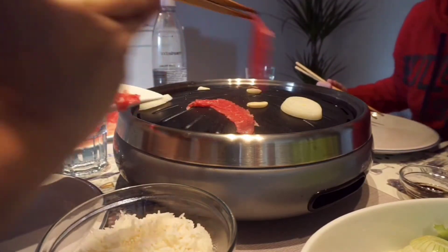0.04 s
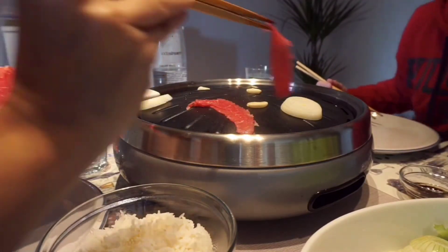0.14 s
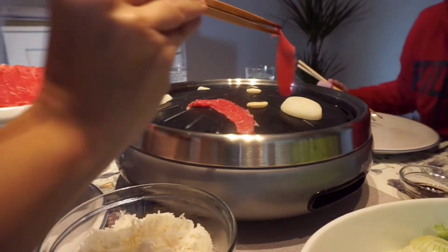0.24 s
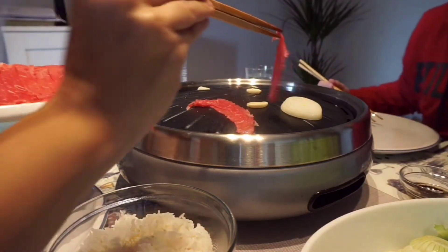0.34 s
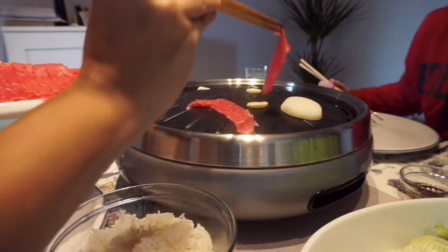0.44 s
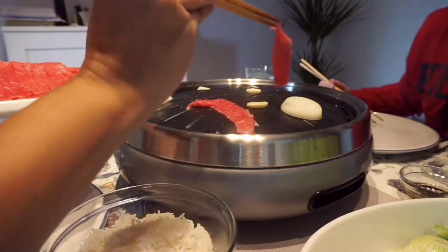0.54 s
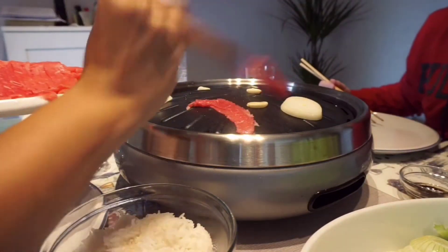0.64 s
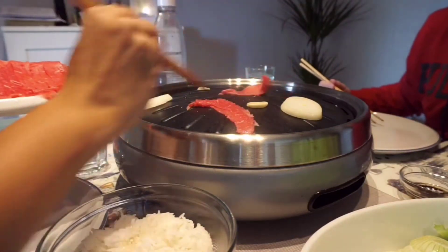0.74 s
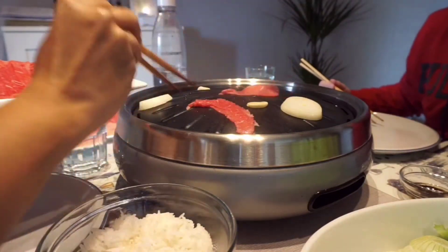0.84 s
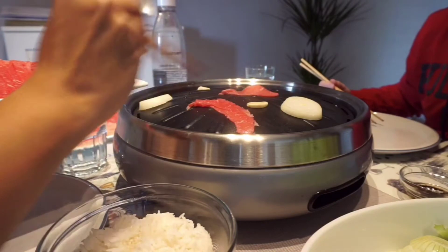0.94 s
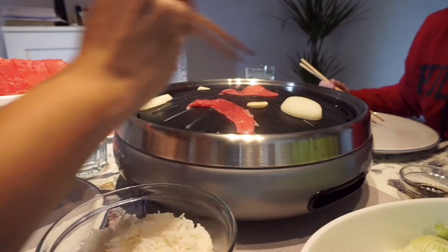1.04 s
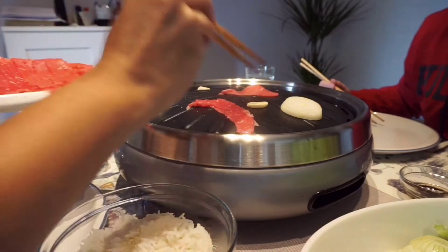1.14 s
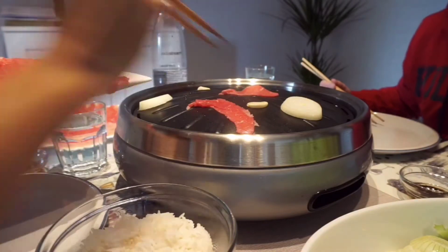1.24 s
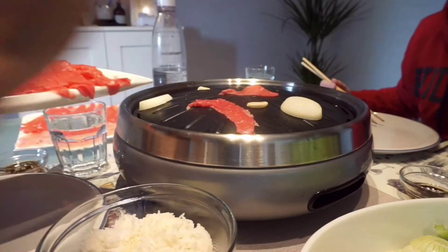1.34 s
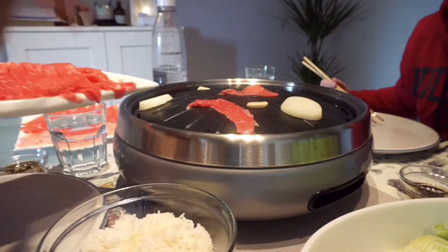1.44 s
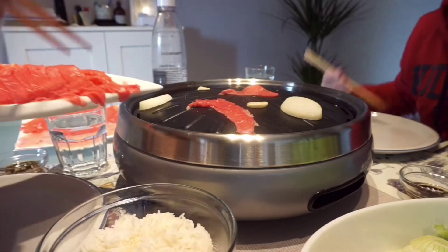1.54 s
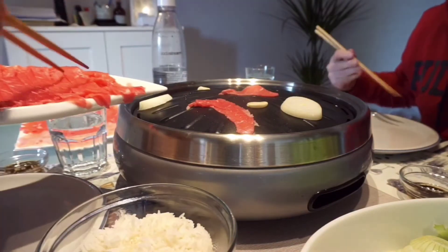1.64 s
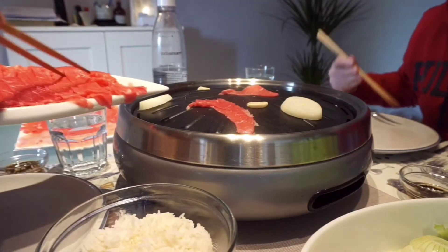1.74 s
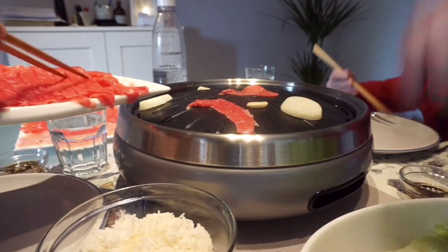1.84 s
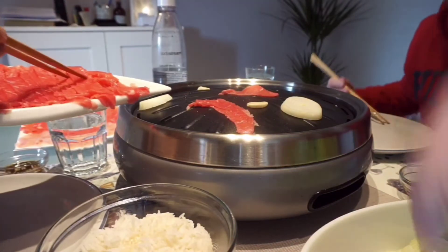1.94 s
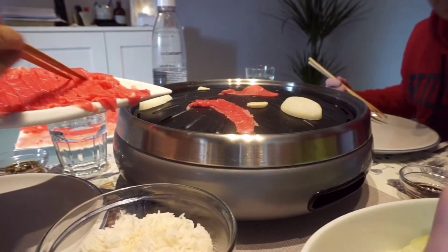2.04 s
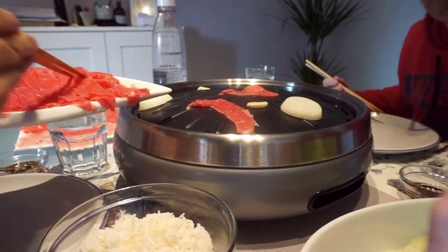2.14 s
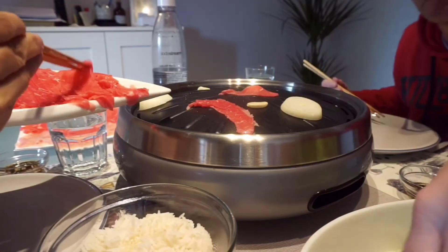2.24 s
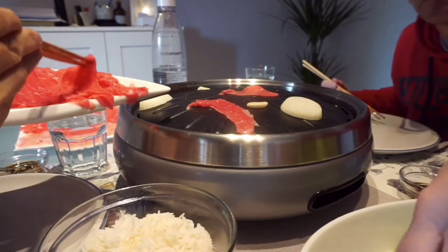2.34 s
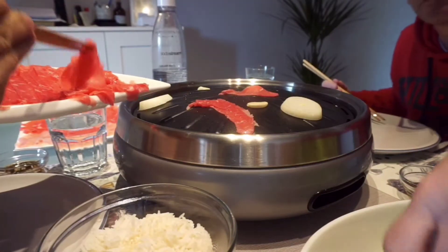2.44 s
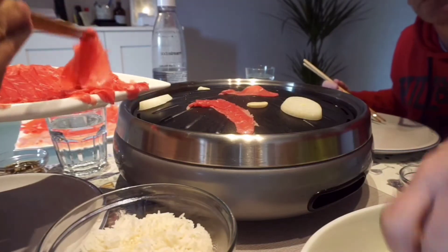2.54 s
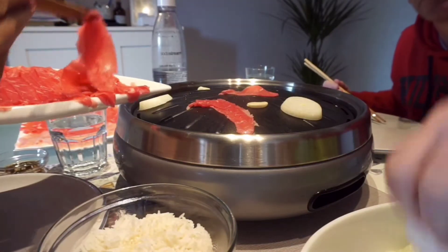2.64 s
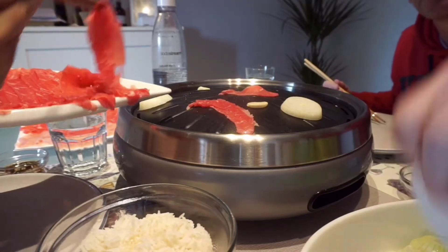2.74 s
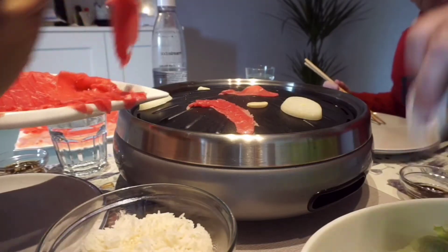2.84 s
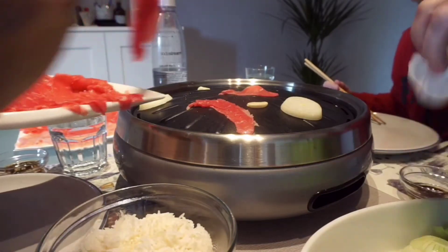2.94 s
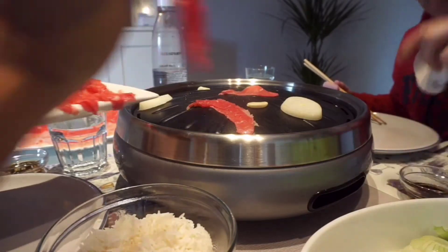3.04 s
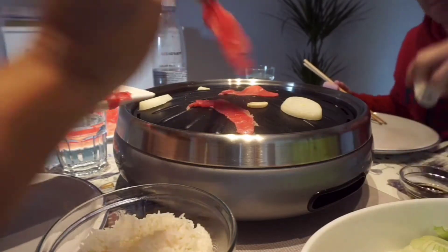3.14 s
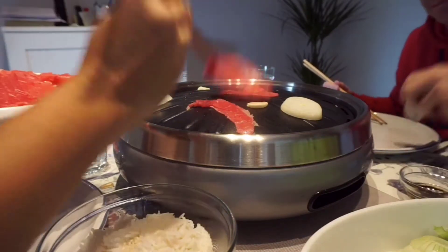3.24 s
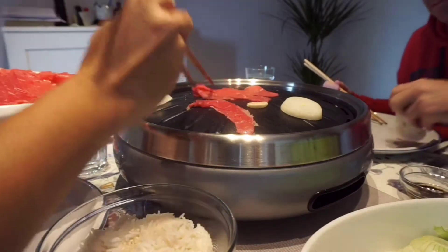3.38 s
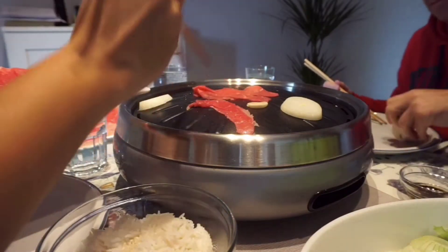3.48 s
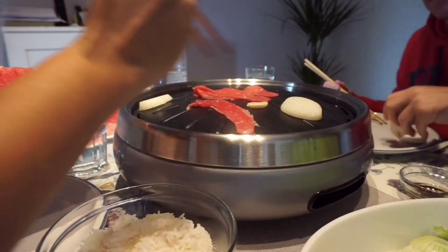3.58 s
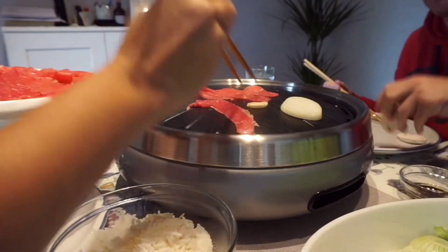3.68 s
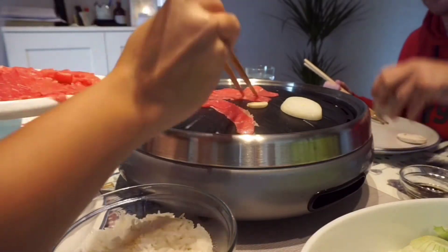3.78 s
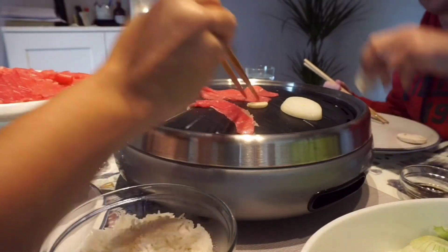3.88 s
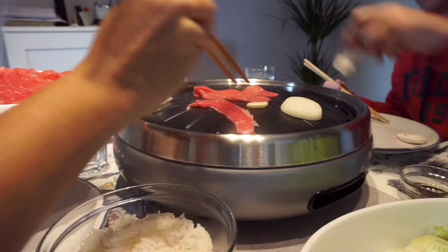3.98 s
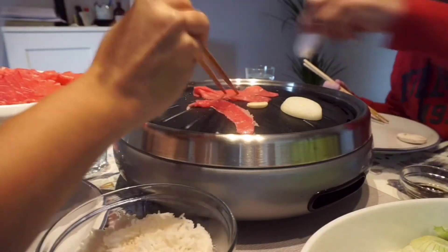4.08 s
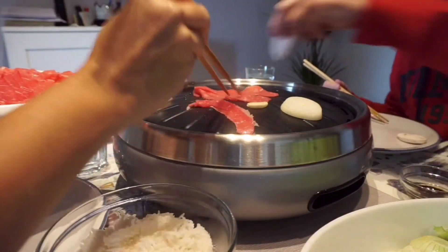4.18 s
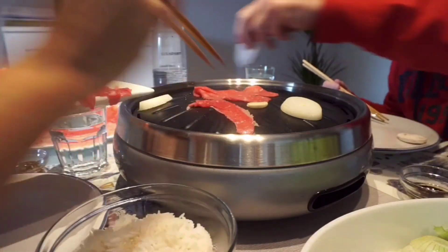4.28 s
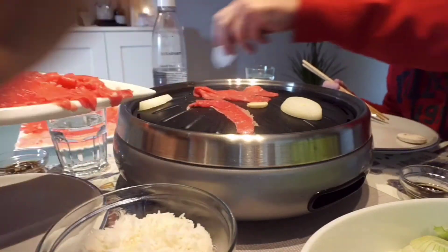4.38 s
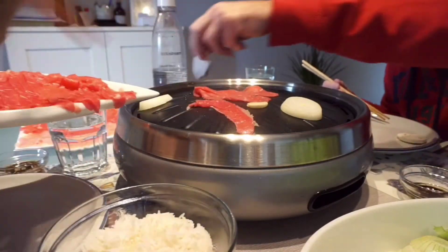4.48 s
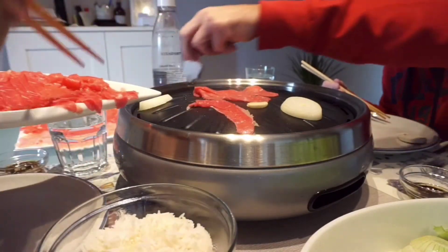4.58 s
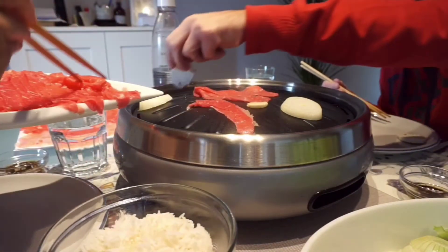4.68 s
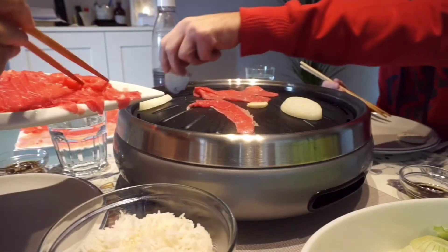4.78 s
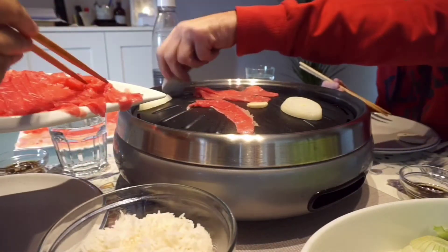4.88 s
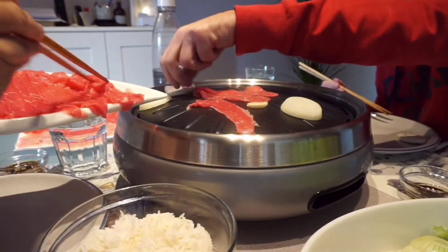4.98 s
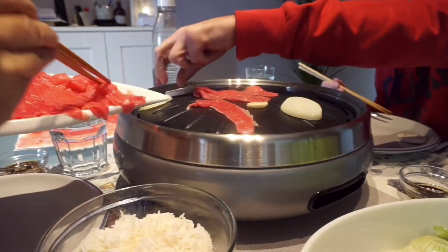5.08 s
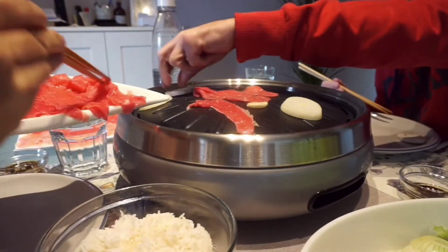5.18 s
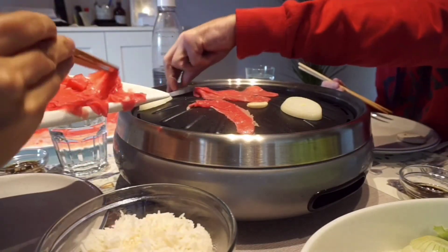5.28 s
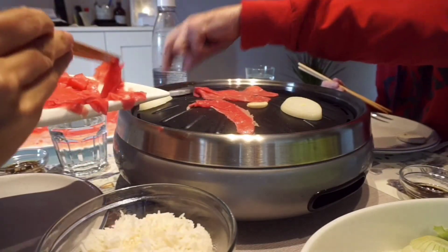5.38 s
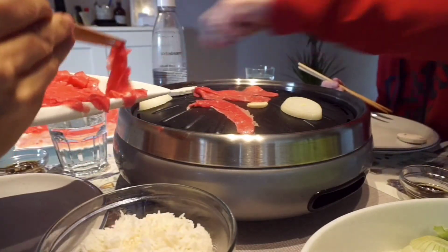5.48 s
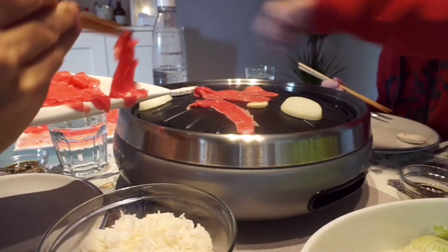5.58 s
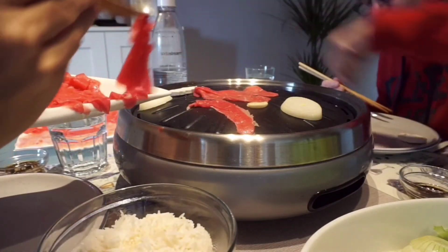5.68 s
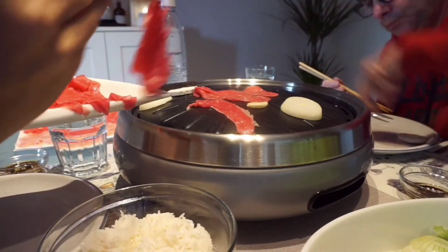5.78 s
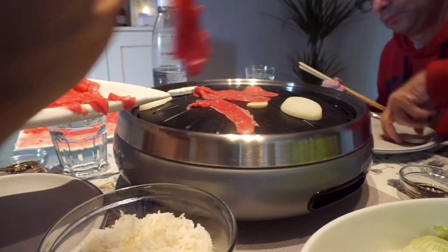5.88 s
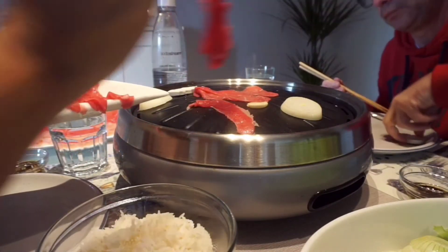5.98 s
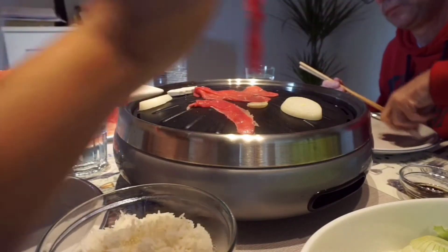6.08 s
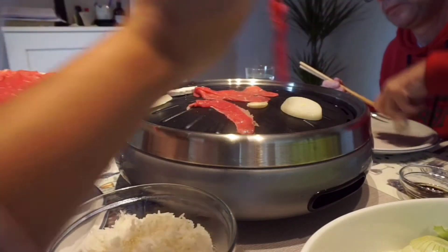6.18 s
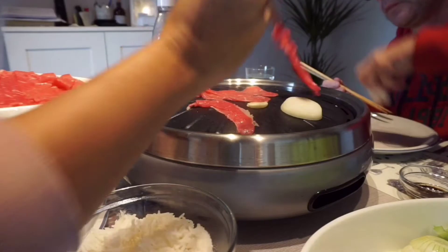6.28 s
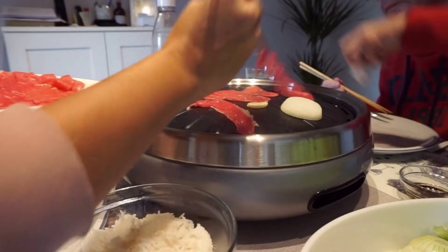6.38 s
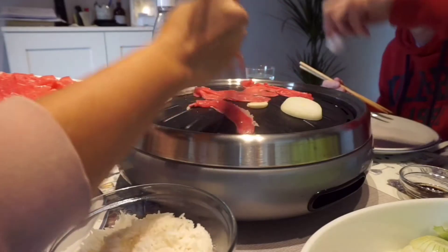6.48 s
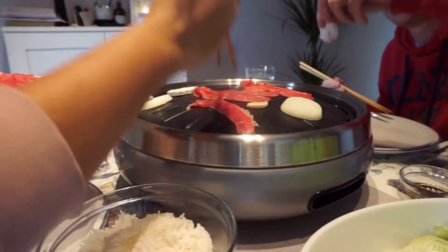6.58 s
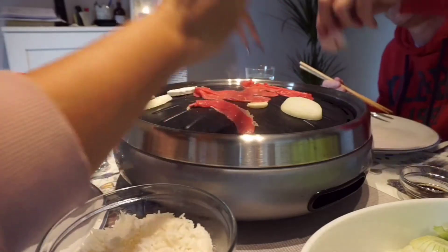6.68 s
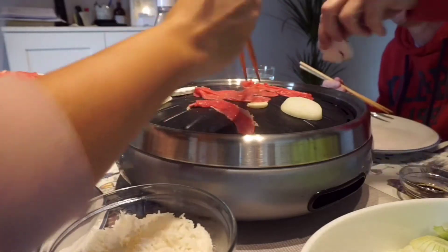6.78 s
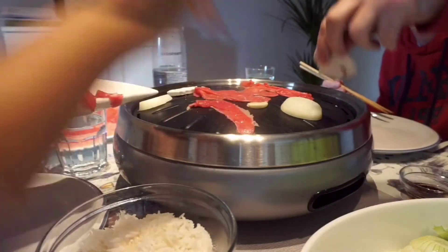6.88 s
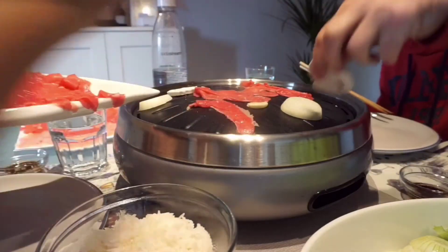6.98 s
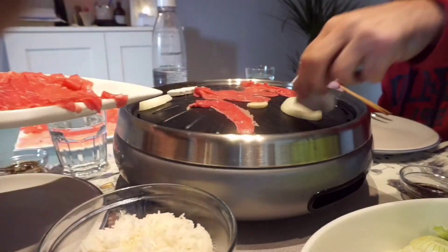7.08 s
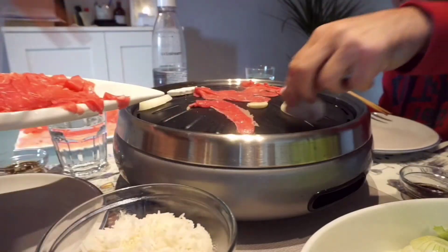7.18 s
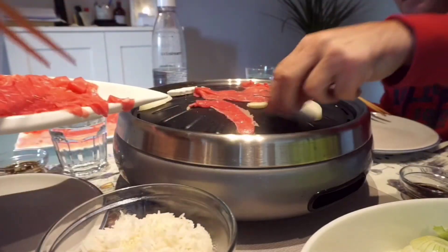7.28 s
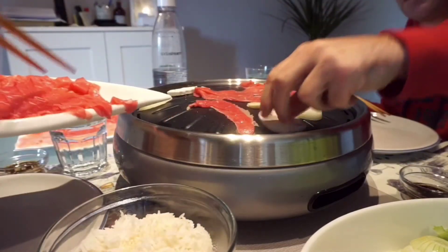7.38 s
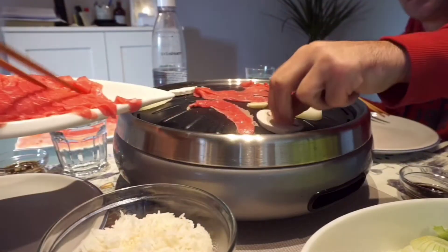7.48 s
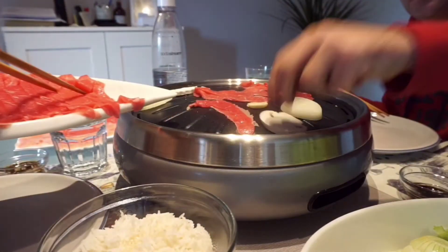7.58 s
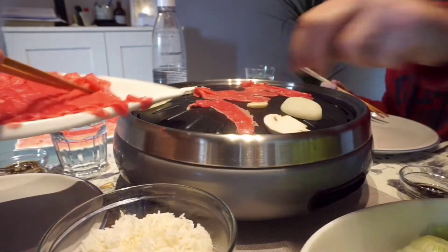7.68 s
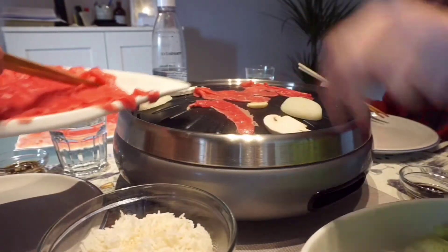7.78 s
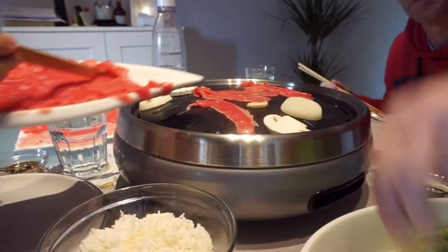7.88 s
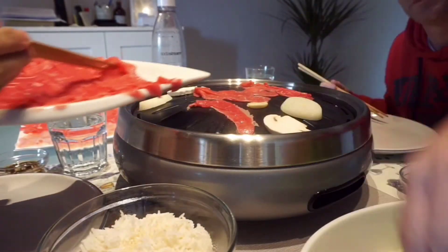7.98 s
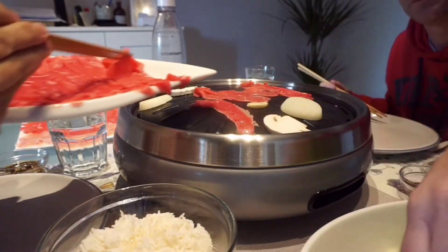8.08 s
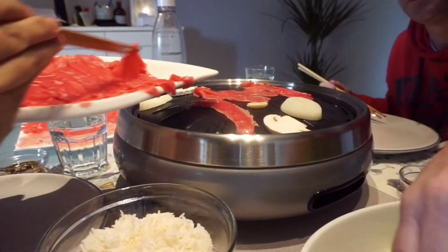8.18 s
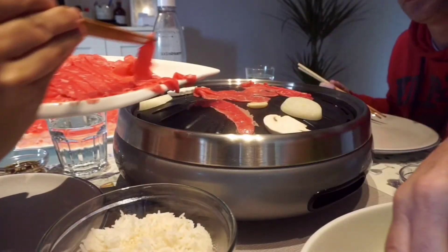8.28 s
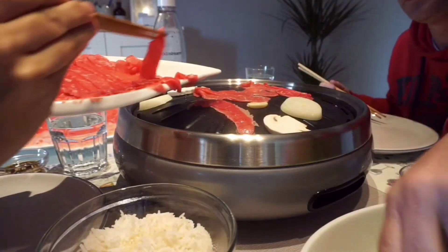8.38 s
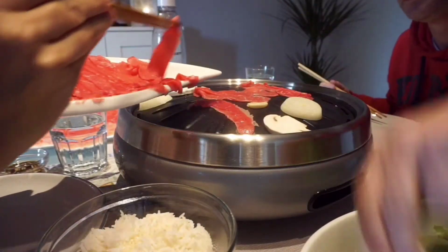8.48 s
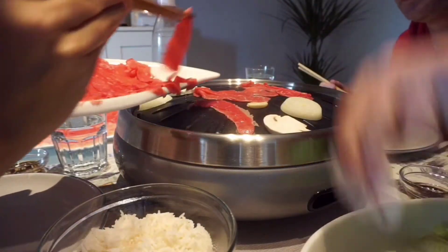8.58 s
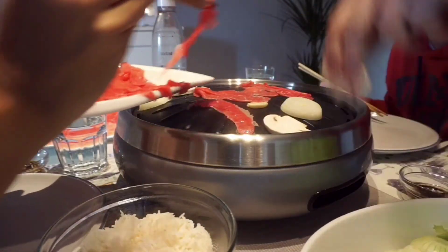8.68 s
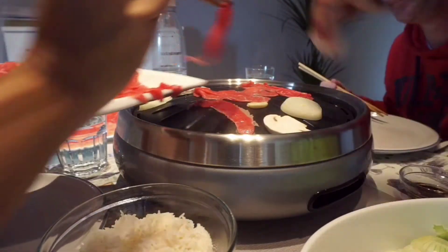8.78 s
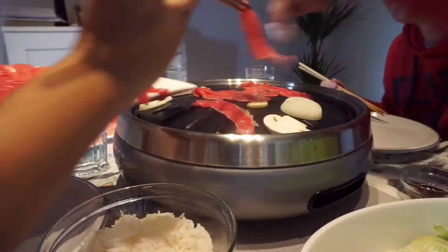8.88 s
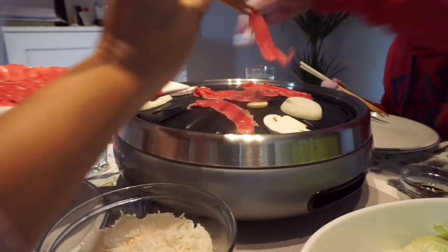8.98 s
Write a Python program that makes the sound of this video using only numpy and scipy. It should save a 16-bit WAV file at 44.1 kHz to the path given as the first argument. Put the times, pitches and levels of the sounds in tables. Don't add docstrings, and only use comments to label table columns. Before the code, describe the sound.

Thin meat slices sizzle unevenly on a hot tabletop grill over a low fan hum, with light chopstick ticks and one firm knock.

```python
import sys
import numpy as np
from scipy import signal
from scipy.io import wavfile

SR = 44100
rng = np.random.default_rng(int(sys.argv[2]) if len(sys.argv) > 2 else 0)


def int16_out(signal):
    q = np.round(np.clip(np.atleast_2d(signal).T, -1, 1) * 32767)
    wavfile.write(sys.argv[1], SR, q.astype(np.int16))


def voltage_ratio(decibels):
    exponent = np.asarray(decibels, float) / 20
    return 10 ** exponent


N = 398223


def rms_one(x):
    return x / np.sqrt(np.mean(x ** 2) + 1e-20)


def in_time(rows):
    s, *columns = np.transpose(rows)
    return [np.interp(np.arange(N) / SR, s, column) for column in columns]


def at_hz(points, hz):
    table_hz, values = np.array(points).T
    return np.interp(np.log(hz), np.log(table_hz), values)


def humps(rows):
    t = np.arange(0, N + 64, 64) / SR
    s, *heights, length_s = np.array(rows).T[:, :, None]
    bells = np.exp(-(2 * (t - s) / length_s) ** 2)
    return [np.interp(np.arange(N) / SR, t, np.sum(h * bells, axis=0)) for h in heights]


def drift(rate):
    step = 40
    r = np.exp(-2 * np.pi * rate * step / SR)
    noise = rng.standard_normal(N // step + 2002)
    slow = signal.lfilter([1], [1, -2 * r, r * r], noise)[2000:]
    return np.interp(np.arange(N) / step, np.arange(len(slow)), rms_one(slow))


def band_pass(x, order, low_hz, high_hz):
    return signal.sosfilt(signal.butter(order, [low_hz, high_hz], "band", fs=SR, output="sos"), x)


def resonance(x, hz, width_hz):
    r = np.exp(-np.pi * width_hz / SR)
    feedback = [1, -2 * r * np.cos(2 * np.pi * hz / SR), r * r]
    return signal.lfilter(np.array([1, 0, -1]) * (1 - r * r) / 2, feedback, x)


def ring(clicks, hz, t60_s):
    r, w = 10 ** (-3 / (t60_s * SR)), 2 * np.pi * hz / SR
    return signal.lfilter([0, np.sin(w)], [1, -2 * r * np.cos(w), r * r], clicks + 1e-18)


# pitch_hz, likeness (0 to 1)
EAR_LIKENESS = [(40, 0.89), (150, 1), (300, 0.97), (700, 0.77), (1500, 0.6), (3000, 0.69), (5500, 0.35),
                (8500, 0.51), (10800, 0.53)]


def spread(pair, hz):
    alike = np.clip(at_hz(EAR_LIKENESS, hz), 0, 1)
    middle = np.sqrt(1 + alike) * pair[0]
    side = np.sqrt(1 - alike) * pair[1]
    return (middle + side * [[1], [-1]]) / np.sqrt(2)


def coloured(sources, low, high, colour, level_db, flicker_db, flicker_rate, count):
    out, edges = 0, np.geomspace(low, high, count + 1)
    for k, (a, b) in enumerate(zip(edges, edges[1:])):
        band = band_pass(sources[k % 2], 2, a, b)
        hz = np.sqrt(a * b)
        gain_db = at_hz(colour, hz) + level_db(hz) + flicker_db * drift(flicker_rate)
        out = out + voltage_ratio(gain_db) * spread(band, hz)
    return out / np.sqrt(np.mean(np.mean(out, axis=0) ** 2))


def bursts():
    pockets_per_s, pocket_spread_db = 9000, -1.5
    shape = (2, 2, N)
    size_db = pocket_spread_db * np.minimum(rng.exponential(1, shape), 6)
    sizes = voltage_ratio(size_db) * rng.standard_normal(shape)
    born = rng.random(shape) < pockets_per_s / SR
    surge = voltage_ratio(0.27 * drift(6.1) + 0.48 * drift(17.0))
    return rms_one(sizes * born) * surge


# time_s, heat_db, juice_db, left_right_db
FRYING = [(0, -33, -47, 1.5), (.72, -31, -47, 1.5), (.84, -31, -37.5, 2), (1.0, -28.5, -39.5, 1.2),
          (1.7, -30.5, -36.5, 1.8), (2.2, -30.5, -40, 1.5), (2.7, -28.5, -40.5, 2), (3.27, -31, -43.5, 2),
          (3.33, -27, -37.5, 1.5), (3.7, -26, -43, 1.2), (4.3, -27, -40, 1.8), (4.8, -25.5, -42, 1.7),
          (5.7, -25, -42, 2), (6.42, -26, -45, 1.3), (6.6, -24.5, -39.5, .5), (7.3, -24.5, -40.5, 1.5),
          (8.4, -25, -41, .7), (9.03, -24, -38.5, .8)]
POCKET_FOLLOWS = [
    (0.43, 0.27),
    (0.02, 1),
    (.75, 0.14),
    (0.99, 0.02),
]
# time_s, fine_pockets_db, coarse_pockets_db, length_s
JUICE_SURGES = [(0.0, 4, 2.5, 0.13), (.98, -1.5, 1, .06), (1.21, -0.5, -0.5, .06), (1.46, 4, 2, 0.034),
                (1.56, 3.5, 2, .025), (1.99, 3.5, 3, 0.037), (2.08, 2.5, 2.5, .04), (2.44, 2, 1.5, .08),
                (3.07, 1, 1, .1), (3.37, 0.5, 2, 0.066), (3.59, 1, 0, .06), (4.35, -1, 5.5, .05),
                (4.45, -1, 3, 0.046), (4.76, 0, 2.5, 0.11), (5.2, 0, 3, 0.084), (6.11, 2.5, -2, 0.058),
                (6.71, 1.5, 1, 0.095), (6.84, 2.5, 1.5, 0.052), (7.34, 2, 0, 0.044), (7.6, -1.5, 2, .04),
                (8.3, 0.5, 2.5, .08), (8.6, 1, 3.5, 0.055)]
# time_s, fine_pockets_db, coarse_pockets_db, length_s
STEAM_LULLS = [(.2, 0, 1, 0.17), (1.1, -1.7, -3.5, 0.074), (1.485, -6, -3.5, 0.033), (1.585, -3, -7, 0.022),
               (1.925, -0.5, -0.5, 0.092), (2.037, -1.5, -2.5, .04), (2.124, -3, 0, 0.037),
               (2.5, -2.5, -1.5, 0.065), (2.77, -2.5, -3.5, 0.17), (3.136, -3, -2, 0.05),
               (3.468, 0, -1, .06), (3.64, -1.5, -3, 0.039), (3.797, -4, -6, 0.071), (4.15, 1.8, -2, 0.48),
               (4.875, -5, -5.5, 0.039), (5.02, -4, -3, .03), (7.882, -2, -2.5, 0.033), (5.08, -1, -1, 0.1),
               (6.05, -1, -5, 0.068), (6.925, 0.5, -1.5, .06), (7.39, -1.5, 1, 0.05),
               (8.52, -1.5, -0.5, .08), (8.656, -2, -0.5, .05)]


def frying():
    heat_db, juice_db, pan_db = in_time(FRYING)
    fine_db, coarse_db = humps(JUICE_SURGES + STEAM_LULLS)
    unrest_db = 0.2 * drift(3.5)
    levels_db = []
    for (heat, juice), fine in zip(POCKET_FOLLOWS, np.linspace(0, 1, len(POCKET_FOLLOWS))):
        swings_db = (1 - fine) * coarse_db + fine * fine_db + unrest_db
        levels_db.append(heat * heat_db + juice * juice_db + swings_db)
    return levels_db, pan_db


# pitch_hz, width_hz, level_db (against the medium sizzle)
PLATE_MODES = [(1672, 30, -21), (1990, 60, -23), (2505, 80, -16), (2820, 75, -22), (3167, 50, -20),
               (4034, 70, -18), (4850, 120, -20), (5120, 60, -21)]


def plate_ring(pops, swing_db):
    out = 0
    for hz, width_hz, db in PLATE_MODES:
        mode = rms_one(resonance(pops[0][:, ::-1], hz, width_hz))
        out = out + voltage_ratio(-37.5 + db + swing_db(hz) + 1.1 * drift(3.0)) * spread(mode, hz)
    return out


# start_s, end_s, pitch_hz, width_hz, level_db
STEAM_VENTS = [(.9, 2.3, 5180, 500, -47), (2.352, 2.6, 4975, 803, -51), (3.502, 3.653, 6680, 898, -39),
               (4.12, 4.22, 6140, 1400, -34), (3.4, 6.0, 10840, 500, -45), (4.601, 4.85, 10700, 500, -59),
               (5.002, 5.4, 8280, 500, -47), (6.504, 9.101, 1880, 295, -53.5), (6.55, 6.9, 6950, 1806, -46),
               (6.7, 7.7, 3358, 401, -48.5), (7.299, 7.7, 8500, 399, -48), (8.193, 9.099, 3430, 500, -55),
               (8.798, 9.098, 6530, 1096, -45)]


def vents(pops, side_db):
    out, t = np.zeros((2, N)), np.arange(N) / SR
    for start, end, hz, width_hz, db in STEAM_VENTS:
        span = slice(round(start * SR), min(round(end * SR), N))
        fade_s = 0.066
        gate = np.clip(np.minimum(t[span] - start, end - t[span]) / fade_s, 0, 1)
        hiss = rms_one(resonance(pops[1][:, span], hz, width_hz))
        out[:, span] += voltage_ratio(db + side_db(hz)[:, span]) * gate * spread(hiss, hz)
    return out


# pitch_hz, level_db (per Hz)
SIZZLE_COLOUR = [(1100, -19.5), (1500, -20.5), (2150, -15), (2700, -11.5), (3500, -10.5), (4200, -6.5),
                 (5500, -6.5), (7000, -7), (8400, -3), (9500, 1.5), (10400, -2.25), (11600, 1.5)]
POCKET_PITCHES = (3500, 4200, 6900, 9500)
# pitch_hz, share
DIRECTION_SHARE = [(2000, .01), (3000, 0.092), (4200, 1), (6000, 1.8), (9000, 0.45), (11000, 1.1)]


def sizzle():
    levels_db, pan_db = frying()
    swings_db = [db - db.mean() for db in levels_db]
    pops = bursts()

    def side_db(hz):
        return at_hz(DIRECTION_SHARE, hz) * pan_db * [[.5], [-.5]]

    def swing_db(hz):
        shares = [np.interp(np.log(hz), np.log(POCKET_PITCHES), row) for row in np.eye(len(swings_db))]
        return sum(share * db for share, db in zip(shares, swings_db) if share) + side_db(hz)

    crackle = coloured(pops, 1208, 12240, SIZZLE_COLOUR, swing_db, flicker_db=0.64, flicker_rate=17.0, count=16)
    return voltage_ratio(-30) * crackle + plate_ring(pops, swing_db) + vents(pops, side_db)


def squeaks():
    squeaks_per_s, level_db, t60_s = 150, -41, .07
    heat_db = in_time(FRYING)[0]
    size_db = level_db + heat_db - heat_db.mean() + 2.6 * rng.standard_normal(N)
    born = (rng.random(N) < squeaks_per_s / SR) * voltage_ratio(size_db)
    pitches_hz = np.geomspace(2400, 9000, num=40)
    dealt, sides_db = rng.integers(0, 40, N), rng.normal(0, 3.0, 40)
    out = 0
    for k, hz in enumerate(pitches_hz):
        gain_db = at_hz(SIZZLE_COLOUR, hz) + sides_db[k] * np.array([[.5], [-.5]])
        out = out + ring(born * (dealt == k), hz, t60_s) * voltage_ratio(gain_db)
    return out


# time_s, peak_db
DROP_CONTACTS = [
    (7.3962, -12),
    (7.3982, -30),
    (7.4018, -18),
    (7.411, -26),
    (7.428, -22),
    (7.439, -25),
]
# pitch_hz, level_db, t60_s
GRILL_BODY = [(515, -4, .045), (603, -8, .08), (795, -7, .06), (975, -15, .04), (1300, -14, .03),
              (1410, -12, .03), (1640, 4, .024), (1900, -4, .02), (2300, -1, .03), (2470, -1, .07),
              (2950, -3, .015)]


def drop():
    times_s, peaks_db = np.array(DROP_CONTACTS).T
    at, out = [round(s * SR) for s in times_s], np.zeros(N)
    luck_db = rng.normal(0, 2.0, (len(at), len(GRILL_BODY)))
    for k, (hz, db, t60_s) in enumerate(GRILL_BODY):
        clicks = np.zeros(N)
        duller_db = 2.5 * np.arange(len(at)) * (hz > 1200)
        clicks[at] = voltage_ratio(peaks_db + db - 13 + luck_db[:, k] - duller_db) * (-1) ** k
        out += ring(clicks, hz, t60_s)
    t = np.arange(SR // 5) / SR
    fall = voltage_ratio(-21 - 60 * t / 0.04) + voltage_ratio(-26 - 60 * t / 0.37)
    slap = rng.standard_normal(len(t)) * fall
    out[at[0]:at[0] + len(t)] += band_pass(slap, 2, 600, 3200)
    return band_pass(out, 2, 330, 3600)


# time_s, peak_db, pitch_hz, t60_s, left_right_db
PLATE_TICKS = [(.749, -36, 2525, 0.17, -8), (.75, -38, 1660, 0.051, -8), (0.751, -41, 1980, 0.12, -2),
               (.774, -37, 2530, 0.14, .1), (.83, -44, 2510, .25, .1), (0.855, -41, 4030, 0.12, 1.5),
               (0.892, -49, 4060, 0.084, -3), (.964, -32, 5000, .05, 1), (.994, -32, 4030, .04, 1.5),
               (1.209, -41, 2530, 0.15, -2), (1.36, -45, 2500, 0.15, .1), (2.245, -42, 2504, .09, -2),
               (4.333, -32, 4030, .12, -5), (4.328, -34, 2990, .04, -8), (4.365, -37, 4000, .1, 1.1),
               (4.455, -47, 4070, 0.085, 1.1), (7.452, -35, 2350, .09, -2), (7.455, -39, 1690, 0.21, 2),
               (7.575, -36, 2450, 0.12, .1), (7.655, -33, 4360, 0.065, 1.5)]


def ticks():
    out = np.zeros((2, N))
    for s, db, hz, t60_s, pan_db in PLATE_TICKS:
        click = np.zeros(N)
        click[round(s * SR)] = voltage_ratio(db)
        out += ring(click, hz, t60_s) * voltage_ratio(.5 * pan_db * np.array([[1], [-1]]))
    return out


# time_s, level_db, pitch_hz, length_s
TABLE_BUMPS = [
    (2.95, -62, 32.9, 0.23),
    (3.42, -44, 110, 0.049),
    (3.47, -43, 139, 0.073),
    (8.34, -38, 130, 0.033),
    (8.5, -48, 120, 0.07),
    (8.43, -57, 70, .1),
    (3.62, -54, 83, .1),
    (7.44, -47, 330, .04),
    (0.77, -41, 200, .05),
]


def bumps():
    t, white = np.arange(N) / SR, rng.standard_normal(N)
    out = np.zeros(N)
    for s, db, hz, length_s in TABLE_BUMPS:
        swell = voltage_ratio(db) * np.exp(-(2 * (t - s) / length_s) ** 2)
        tone = np.sin(2 * np.pi * hz * t)
        rumble = rms_one(resonance(white, hz, .6 * hz))
        out += swell * (0.62 * tone + .45 * rumble)
    return out


# time_s, air_and_housing_db, blade_tone_db
FAN_COURSE = [(0, -47.5, -48), (.55, -46, -45.5), (1.0, -48, -46.5), (1.6, -51, -50), (2.3, -48.5, -47.5),
              (2.86, -47, -46), (3.14, -50.5, -54), (3.4, -46, -46.5), (3.9, -48, -48.5), (4.4, -47.5, -50),
              (5.3, -47.7, -47), (6.35, -46, -46.5), (6.65, -49, -44), (7.1, -50, -51), (7.5, -45.5, -48),
              (8.0, -49, -52.5), (8.5, -48, -44), (9.03, -45, -48)]
# pitch_hz, level_db (per Hz)
AIR_COLOUR = [(25, -31), (38, -22), (70, -27), (130, -25), (190, -11.5), (240, -6), (300, -11), (445, -17),
              (600, -13), (800, -15), (1000, -16), (1250, -17), (1800, -17.5)]
# pitch_hz, width_hz, level_db (against the air)
HOUSING_MODES = [(98.8, 11.5, -15.5), (134.3, 13, -11), (162, 9.5, -9), (195.2, 16, -8.5), (224.1, 20, -5),
                 (239.7, 13.7, -10), (606, 72, -12), (893, 44, -20)]
# multiple, level_db
BLADE_OVERTONES = [(3, -10.5), (4, -13)]
# time_s, level_db, length_s
BLADE_DIPS = [(.22, -2, 0.033), (1.12, -14, .08), (1.41, -2, .06), (1.53, -10, 0.045), (2.49, -13, 0.034),
              (3.34, -7, 0.036), (4.24, -12, 0.054), (5.18, -22, 0.058), (5.83, -7, 0.049),
              (5.93, -22, 0.021), (6.27, -10, 0.031), (6.78, -27, .06), (7.57, -17, .05), (8.12, 5, 0.029),
              (8.36, -11, 0.13), (8.48, -15, 0.055)]
# time_s, pitch_change_hz, length_s
FAN_SLOWS = (7.47, -4, 0.288)


def fan():
    air_db, blade_db = in_time(FAN_COURSE)
    air_db = air_db + 0.72 * humps(JUICE_SURGES + STEAM_LULLS)[1]
    blade_db = blade_db + humps(BLADE_DIPS)[0] + 3 * drift(17)
    white = rng.standard_normal((2, 2, N))
    air = voltage_ratio(1.0) * coloured(white, 25.35, 1945, AIR_COLOUR, lambda hz: 0,
                              flicker_db=1.36, flicker_rate=12.7, count=14)
    for k, (hz, width_hz, db) in enumerate(HOUSING_MODES):
        mode = resonance(resonance(white[k % 2], hz, width_hz), hz, width_hz)
        air = air + voltage_ratio(db) * spread(rms_one(mode), hz)
    blade_hz = 240.2 + humps([FAN_SLOWS])[0] + 0.671 * drift(8.66)
    turn = 2 * np.pi * np.cumsum(blade_hz) / SR
    tone = voltage_ratio(blade_db) * np.sin(turn)
    for k, db in BLADE_OVERTONES:
        level = voltage_ratio(air_db - 0.5 + db + 2.2 * drift(3.0))
        tone = tone + level * np.sin(k * turn + 0.12 * k * drift(8.2))
    return voltage_ratio(air_db) * air + np.sqrt(2) * tone


def room(x):
    t60_s, wall_cut_hz, build_s = .4, 1200, .012
    t = np.arange(SR // 2) / SR
    echoes = rng.standard_normal((2, len(t))) * voltage_ratio(-60 * t / t60_s) * np.clip(t / build_s, 0, 1)
    ears = echoes[0] + 0.36 * echoes[1] * [[1], [-1]]
    ears = signal.sosfilt(signal.butter(1, wall_cut_hz, fs=SR, output="sos"), ears)
    return signal.fftconvolve(x[None], ears / np.sqrt(np.sum(ears[0] ** 2)), axes=1)[:, :N]


def scene():
    blows = ticks() + drop()
    tail = voltage_ratio(-12) * room(blows.mean(axis=0))
    return sizzle() + squeaks() + blows + tail + bumps() + fan()


def low_pass(x):
    return signal.sosfilt(signal.butter(12, 12330, fs=SR, output="sos"), x)


def record(dry):
    wall = signal.ellip(18, .1, 70, 11010, fs=SR, output="sos")
    mix = signal.sosfilt(wall, dry)
    return low_pass(mix)


dry = scene()
out = record(dry)
int16_out(out)
```